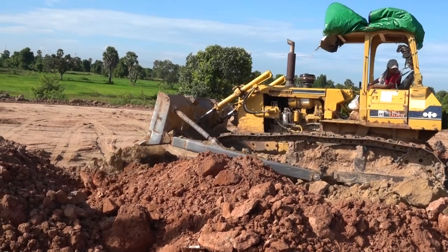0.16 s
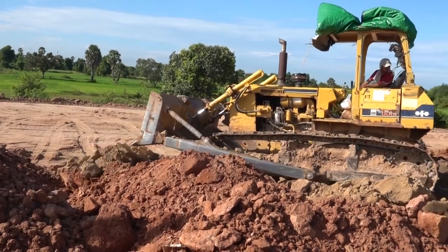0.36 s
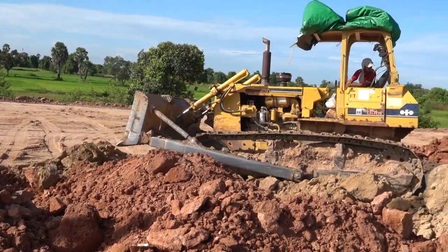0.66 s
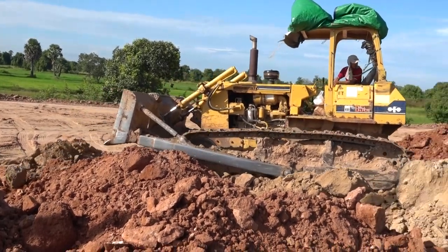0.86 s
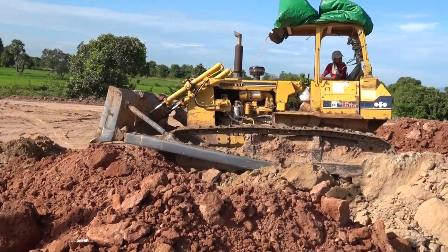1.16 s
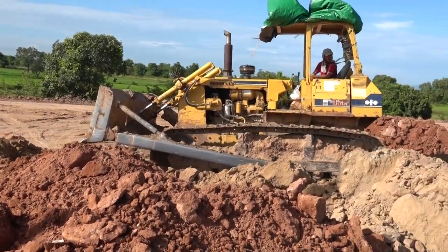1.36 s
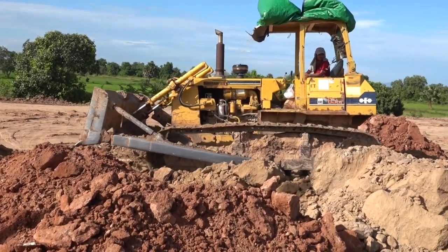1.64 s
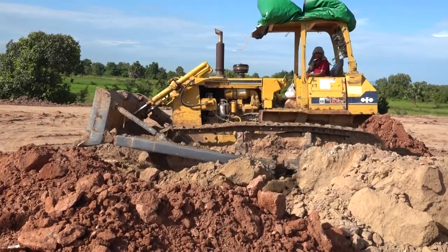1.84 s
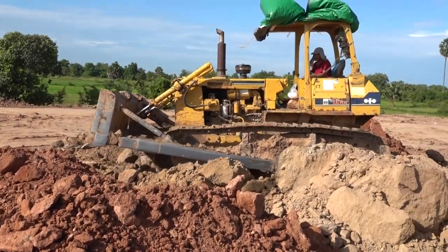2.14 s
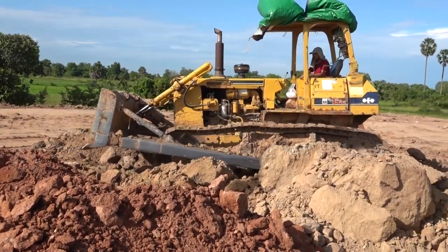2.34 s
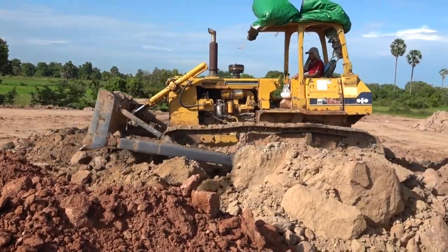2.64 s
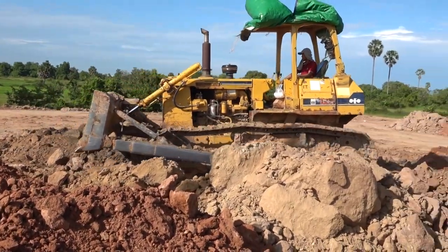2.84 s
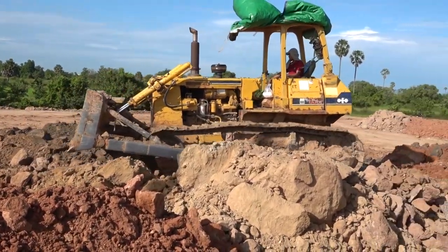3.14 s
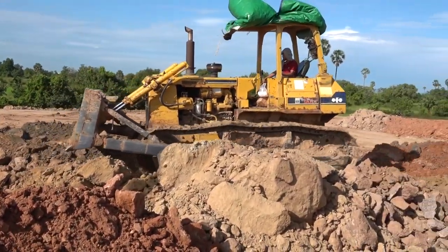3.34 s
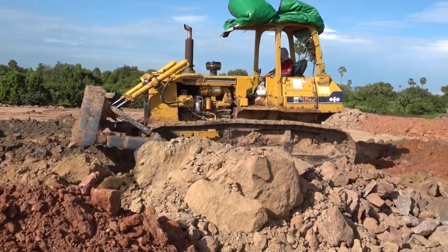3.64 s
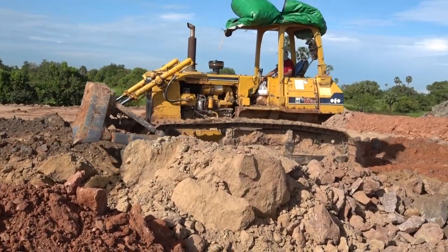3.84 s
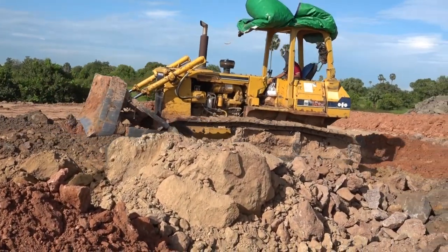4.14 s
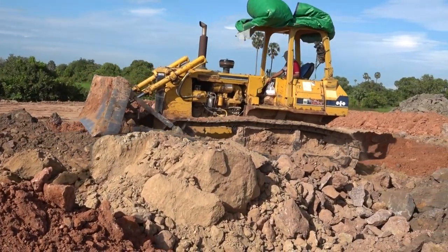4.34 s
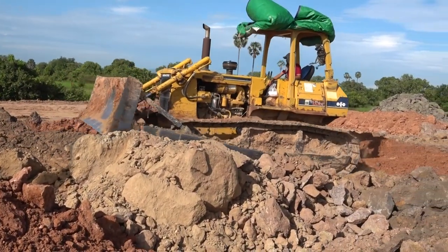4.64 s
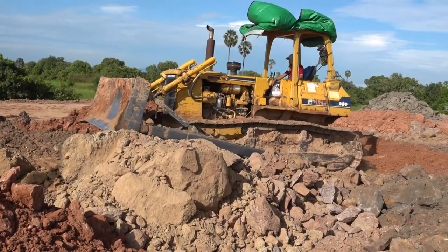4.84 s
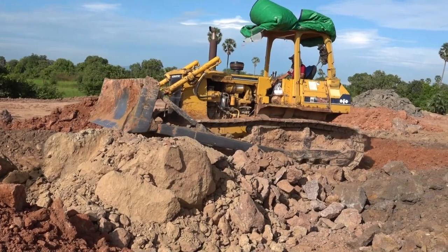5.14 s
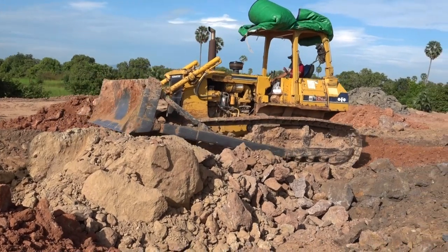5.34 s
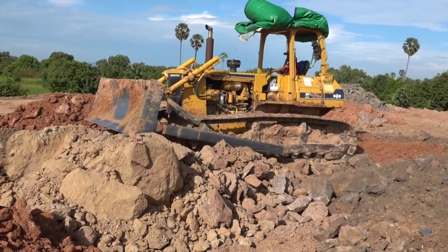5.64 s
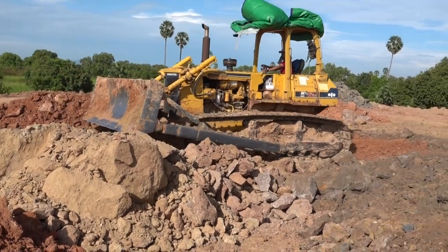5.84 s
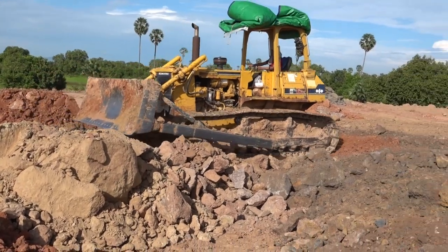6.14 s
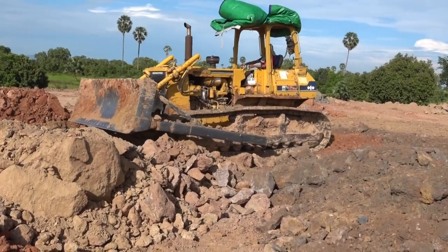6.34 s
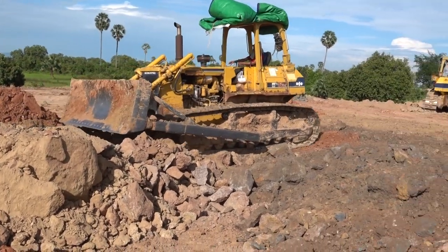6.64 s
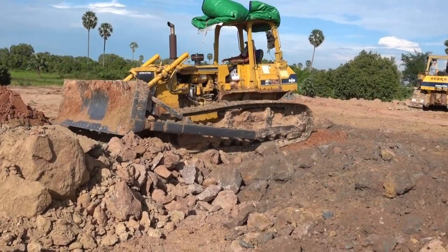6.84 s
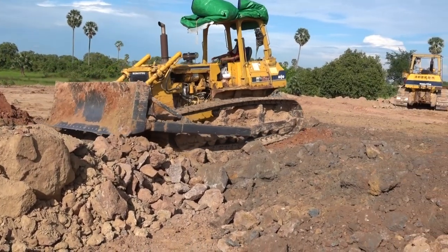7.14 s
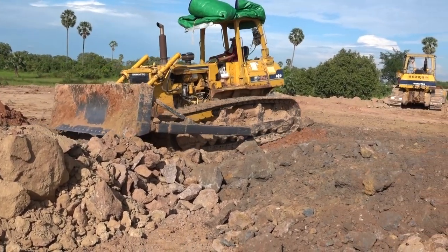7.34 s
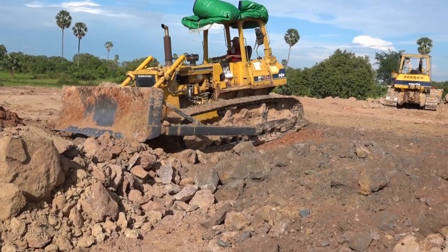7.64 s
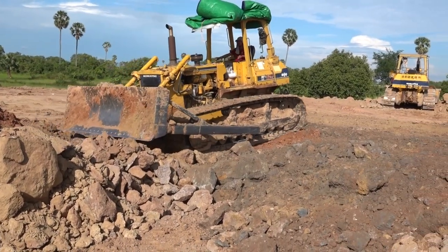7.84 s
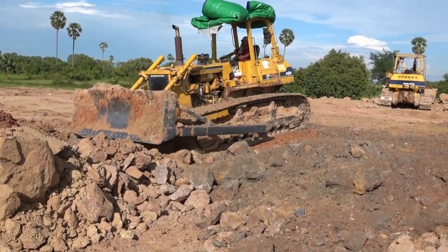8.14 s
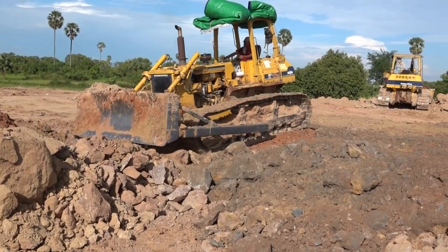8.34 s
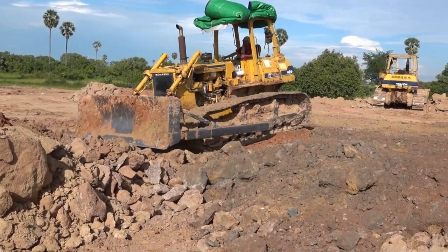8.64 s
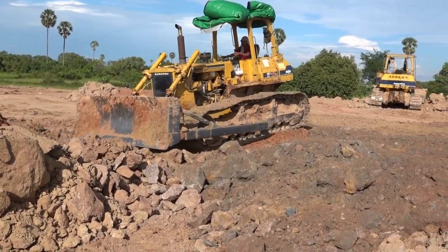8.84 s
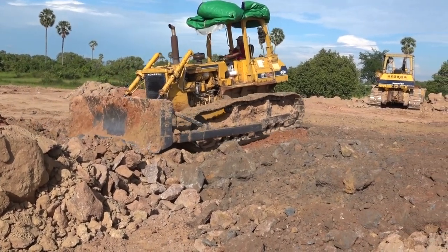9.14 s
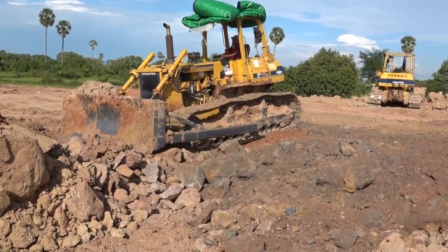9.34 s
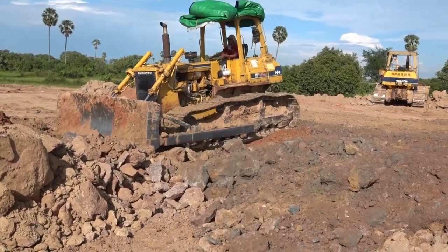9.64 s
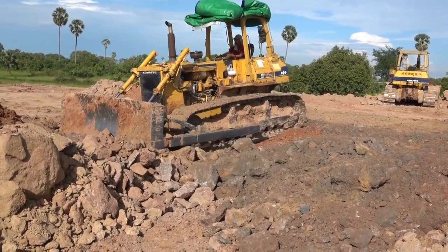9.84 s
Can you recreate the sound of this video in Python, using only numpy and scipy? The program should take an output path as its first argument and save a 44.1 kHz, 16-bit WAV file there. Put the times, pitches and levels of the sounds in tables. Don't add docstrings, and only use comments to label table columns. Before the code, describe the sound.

A bulldozer's heavy diesel drones with a deep, nearly pure exhaust hum and broad engine roar, over rumbling tracks, faint squeaks and scattered metal clanks.

```python
import sys
import numpy as np
from scipy import signal
from scipy.fft import rfft, irfft
from scipy.io import wavfile
from scipy.ndimage import uniform_filter1d, minimum_filter1d

SR = 44100
rng = np.random.default_rng(int(sys.argv[2]) if len(sys.argv) > 2 else 0)


def invert_db(x):
    u = np.asarray(x, float) / 20
    return 10 ** u


def wrap_up_sound(samples):
    columns = np.atleast_2d(samples).T
    tamed = np.clip(columns, -1, 1)
    steps = np.round(tamed * 32767).astype(np.int16)
    wavfile.write(sys.argv[1], SR, steps)


N = 440118

# time in seconds, firing rate in Hz, level in dB.
FAR_MACHINE = [
    (0, 46.67, -42),
    (1.5, 47, -39),
    (2.2, 47.2, -32),
    (3.5, 47.4, -31.5),
    (4.2, 47.6, -40),
    (9.98, 45.2, -43.5),
]
# time in seconds, level in dB.
FAN = [
    (0, -37),
    (.7, -35),
    (1.2, -51),
    (9.98, -51.5),
]
# time in seconds, level in dB.
RUMBLE = [
    (0, -36),
    (1.5, -40.5),
    (2.5, -31.5),
    (4, -38),
    (5.5, -29.5),
    (6.5, -35.5),
    (8, -37),
    (9.98, -36),
]
# time in seconds, rattle in dB, treble above it in dB, loudest ring in Hz.
CLANKS = [(1.116, -50, -12, 6100), (1.33, -55.5, -14, 8900), (1.434, -44, -13.5, 7700),
          (1.457, -44.5, -11, 8420), (1.505, -46, -7.5, 8600), (1.542, -55.5, -16, 5400),
          (1.582, -53, -4, 12180), (1.611, -48.5, -14, 6600), (2.041, -59, -14, 2510),
          (2.929, -59, -10, 6800), (3.05, -58, -5, 9584), (3.145, -51, -11, 8750), (3.163, -51.5, -6, 4770),
          (4.02, -58, -11, 8264), (5.4, -61, -3, 7855), (5.812, -56.5, 0.5, 3150), (5.843, -50.5, -7, 2650),
          (6.067, -53, -4, 2650), (6.188, -53, 3.5, 10700), (6.215, -52.5, -6, 8790), (6.455, -60, 3, 8480),
          (7.07, -53, -13, 6900), (7.091, -51, -16, 2944), (7.351, -58, -18, 3130), (7.838, -62, -2, 7540),
          (8.184, -59, -15, 3377), (8.55, -62, -4, 3950), (8.777, -50, -21, 6137), (8.816, -52, -13, 12020),
          (8.8, -55.5, -2.5, 12180)]
# start in seconds, pitch in Hz, level in dB, 60 dB decay in seconds.
PLATES = [(.123, 1150, -28, .08), (1.432, 5500, -51, .15), (1.436, 12480, -64, .25),
          (1.465, 3350, -50, .15), (1.503, 12100, -62, .15), (1.54, 5300, -56, .2), (1.6, 5700, -56, .2),
          (5.835, 8600, -59, .15), (5.84, 10030, -67, .3), (2.928, 3385, -52, .3), (7.351, 5320, -61, .35),
          (8.8, 5545, -63, .6), (5.84, 2650, -47, .12), (1.47, 1000, -31, .3)]
# start in seconds, length in seconds, level in dB.
PIN_SQUEAKS = [(.435, .025, -62), (1.152, .018, -60), (1.22, .025, -54), (1.522, .032, -55),
               (1.79, .025, -48), (2.099, .05, -51), (2.165, .05, -49), (2.222, .045, -52),
               (4.134, .04, -53), (4.17, .06, -48), (4.248, .029, -54), (6.462, .04, -57)]
# start in seconds, level in dB.
IDLER_CHIRPS = [(.005, -47.5), (.26, -66), (.33, -68), (.77, -64), (1.225, -58), (2.34, -66), (2.74, -70),
                (3.128, -60), (3.46, -59), (4.531, -62), (5.398, -64), (5.94, -70), (6.36, -64),
                (6.59, -69), (6.73, -71), (7.039, -61), (7.17, -64), (7.23, -65), (7.319, -66), (7.58, -67),
                (8.1, -67), (8.387, -64), (8.49, -72), (8.727, -63), (8.92, -67), (9.16, -71), (9.22, -66),
                (9.39, -66), (9.86, -67)]
# start in seconds, length in seconds, pitch in Hz, level in dB, glide in Hz.
HOWLS = [
    (1.72, .2, 506, -33, 0),
    (2.15, .3, 506, -30, 0),
    (2.75, .3, 445, -33, 0),
    (4.08, .2, 506, -32, 0),
    (4.1, .25, 600, -36, 15),
    (5.49, .32, 508, -26.5, 0),
    (5.7, .2, 440, -33, 0),
    (6.83, .33, 685, -35, -125),
    (8.9, .3, 1010, -40, 0),
]
PIN_HZ, IDLER_HZ, CHIRP_S = 3886, 7904, .075
GRIND_S, GRIND_LENGTH_S, GRIND_DB = 1.425, .26, -53
RING_DB, RING_DB_PER_OCTAVE = 13, -9

# time in seconds, firing rate in Hz.
SPEED = [(0, 75.2), (1.15, 84.9), (1.93, 90), (2.4, 84.4), (3.9, 84.9), (4.3, 87.6), (4.63, 92),
         (5.15, 85.6), (6.3, 84), (6.75, 88), (7.5, 83.3), (7.8, 82.3), (8.24, 82), (8.8, 95.7),
         (9.1, 96.2), (9.25, 91.2), (9.72, 101.4), (9.98, 103)]
FLYWHEEL_S = .08
VALVE_DB, FIRST_VALVE_HALF, END_VALVE_HALF = -46, 19, 31
# line in sixths of the firing rate, level in dB.
SIXTHS = [(3, -33.5), (4, -40), (5, -40.5), (8, -38.5), (9, -46.5), (10, -50.5), (18, -43), (20, -55.5),
          (24, -43), (30, -46), (39, -48.5), (42, -47.5), (21, -45), (41, -47)]
# time in seconds, hum level in dB, octave level in dB.
STACK_DB = [(0, -10, -31.5), (.7, -11, -22.5), (1.2, -11.5, -18), (1.88, -11.5, -21), (2.1, -14.5, -27),
            (2.6, -13, -25), (4.3, -13.5, -24), (4.7, -12.5, -30.5), (5.08, -16, -55), (5.65, -11.5, -34.5),
            (6.55, -9.5, -37.5), (6.85, -12, -50), (7.2, -8, -44), (7.8, -10, -29), (8.5, -9.5, -37),
            (8.95, -9, -30.5), (9.55, -11, -30), (9.98, -12, -39)]
# time in seconds, view (rear 0, side 1, front 2).
FACING = [
    (0, 0.),
    (1.6, 0.38),
    (2.8, 0.93),
    (6.2, 1.1),
    (6.9, 1.68),
    (9.4, 2.01),
    (9.98, 1.25),
]
# time in seconds, effort in dB.
EFFORT = [(0, 1.5), (.9, 1.5), (1.75, 2.5), (2.2, 0), (2.75, 2.5), (3.3, 6.5), (3.65, 5.5), (3.95, 3.5),
          (4.22, 6.5), (4.55, 3), (5.1, 1), (5.6, 4), (6.3, 0.5), (7.5, -3.5), (8.4, -2), (8.95, 1.5),
          (9.35, -2.5), (9.98, 2)]
# dB per dB of effort, dB from the rear, dB from the front.
ROAR_LAW = [
    (0.51, .5, -1.5),
    (-0.03, -2, -5.5),
    (1.41, -0.5, 0),
    (0.89, 6.5, -1),
]
ROAR_EDGES_HZ = (360, 900, 1900, 5000)
# frequency in Hz, level in dB.
ROAR_COLOUR = [(230, -5), (330, 1.06), (560, -2), (900, -4.5), (1200, -10.5), (1700, -16), (2100, -24.5),
               (2700, -28), (3400, -37.5), (4500, -39.5), (7000, -40), (9000, -48.5), (12000, -55),
               (15000, -68)]
# resonance in Hz, width in Hz, boost in dB.
PANELS_REAR = [(303, 20, 2), (390, 40, -2), (577, 120, -4.5), (825, 50, 2), (1180, 140, 4.5),
               (1500, 260, 2), (1820, 490, -5.5), (2550, 220, 4.5), (7800, 700, 2), (8600, 770, -10),
               (9800, 1000, -1), (13000, 2000, -0.5)]
PANELS_SIDE = [(241, 33, 5.5), (300, 8.3, 1.5), (434, 17, -1), (499, 7.1, 4.5), (880, 40, 1), (977, 58, 3),
               (1260, 75, -9), (1450, 140, 3.5), (2010, 140, 4.5), (4470, 540, 3), (7300, 1200, 1),
               (8600, 600, 0), (10100, 900, 2.5), (11300, 1000, -6.5)]
PANELS_FRONT = [(233, 77, -8.5), (327, 46, 7), (498, 13, 3), (1000, 46, 2), (1747, 85, -7.5),
                (1990, 230, 5), (2250, 150, -4), (2650, 130, -3), (4300, 500, 3), (5700, 200, 4.5),
                (7200, 1100, 2.5), (10000, 1000, 6), (11500, 1000, -3)]


def curves(table):
    s, *columns = np.transpose(table)
    return [np.interp(np.arange(N) / SR, s, c) for c in columns]


def unit(x):
    return x / np.sqrt(np.mean(x ** 2))


def walk(rate):
    hold = int(SR / rate)
    steps = np.repeat(rng.standard_normal(N // hold + 1), hold)
    return unit(uniform_filter1d(uniform_filter1d(steps, hold), hold)[:N])


def shape(x, db_of_hz):
    hz = np.fft.rfftfreq(N + N % 2, 1 / SR) + 1
    return irfft(rfft(x, N + N % 2) * invert_db(db_of_hz(hz)))[:N]


def band_noise(lo_hz, hi_hz):
    octave = np.log2(np.fft.rfftfreq(N + N % 2, 1 / SR) + 1)
    place = (octave - np.log2(lo_hz)) / np.log2(hi_hz / lo_hz)
    window = np.sin(np.pi * np.clip(place, 0, 1))
    return unit(irfft(window * rfft(rng.standard_normal(N + N % 2)))[:N])


def ring(x, hz, t60):
    pole = np.exp(2j * np.pi * hz / SR - np.log(1000) / (t60 * SR))
    return signal.lfilter([1], [1, -pole], x).imag


def far_machine():
    hz, db = curves(FAR_MACHINE)
    return np.sqrt(2) * invert_db(db + 1.1 * walk(3)) * np.sin(2 * np.pi * np.cumsum(hz) / SR)


def rumble():
    db, = curves(RUMBLE)
    low = invert_db(-1.5 + 1.7 * walk(3.9)) * band_noise(4.5, 70)
    middle = invert_db(2.5 + 2.1 * walk(4.2)) * band_noise(44, 200)
    return invert_db(db) * (low + middle)


def idler_whistle():
    t = np.arange(N) / SR
    return invert_db(-79 + 5 * walk(16)) * np.sin(2 * np.pi * IDLER_HZ * t + 1.2 * walk(40))


def squeals(table, waver_db, waver_rate):
    sound, t = 0, np.arange(N) / SR
    waver = invert_db(waver_db * walk(waver_rate) - waver_db)
    wobble = 0.59 * walk(waver_rate)
    for s, length, hz, db, glide_hz in table:
        part = np.clip((t - s) / length, 0, 1)
        swell = np.sin(np.pi * part) ** 0.55
        cycles = hz * t + glide_hz * length * part ** 2 / 2
        sound = sound + invert_db(db) * swell * np.sin(2 * np.pi * cycles + wobble)
    return 2 * sound * waver


def grind():
    part = np.clip((np.arange(N) / SR - GRIND_S) / GRIND_LENGTH_S, 0, 1)
    envelope = np.minimum(part / .08, 1) * (1 - part) ** .6
    scrape = band_noise(3000, 9200) + .8 * band_noise(4900, 6100) + .25 * band_noise(8000, 14500)
    return invert_db(GRIND_DB + 3 * walk(60)) * envelope * scrape


def rattle(grit, lo_hz, hi_hz, luck):
    modes = sum(invert_db(-8 * place) * ring(grit, lo_hz * (hi_hz / lo_hz) ** place, .04) for place in luck)
    band = signal.butter(4, (.8 * lo_hz, .95 * hi_hz), "band", fs=SR, output="sos")
    scrape = signal.sosfilt(band, grit)
    start = slice(0, SR // 50)
    return 0.55 * modes / modes[start].std() + .5 * scrape / scrape[start].std()


def clanks():
    sound, size = np.zeros(N + SR), SR // 4
    t = np.arange(size) / SR
    onset = np.minimum(t / .003, 1)
    for (s, low_db, treble_db, hz), luck in zip(CLANKS, rng.random((len(CLANKS), 2, 7))):
        grit = rng.standard_normal(size) * np.exp(-t / .018) * onset
        blow = invert_db(low_db) * rattle(grit, 4700, 8000, luck[0])
        blow += invert_db(low_db + treble_db) * rattle(grit, 8000, 12500, luck[1])
        ring_db = low_db + RING_DB + RING_DB_PER_OCTAVE * np.log2(hz / 2700)
        blow += invert_db(ring_db) * np.sin(2 * np.pi * hz * t) * np.exp(-t / 0.016) * onset
        sound[int(s * SR):][:size] += blow
    for s, hz, db, t60 in PLATES:
        plate = invert_db(db + 7.5 - 60 * t / t60) * np.sin(2 * np.pi * hz * t)
        sound[int(s * SR):][:size] += plate * np.minimum(t / .002, 1)
    ticks = (rng.random(N) < 25 / SR) * invert_db(2.1 * rng.exponential(size=N))
    patter = signal.lfilter([1], [1, -np.exp(-1 / (.008 * SR))], ticks)
    return sound[:N] + invert_db(-73.5) * patter * band_noise(5000, 15500)


def cooling_fan(turns):
    db, = curves(FAN)
    return np.sqrt(2) * invert_db(db + 1.5 * walk(4)) * np.sin(2 * np.pi * turns * 7 / 3)


def valve_gear(turns):
    sound = 0
    for half in range(FIRST_VALVE_HALF, END_VALVE_HALF, 2):
        level = invert_db(VALVE_DB - .3 * (half - FIRST_VALVE_HALF) + 3 * walk(1.2))
        sound = sound + level * np.sin(np.pi * half * turns + 7 * rng.random() + .5 * walk(3))
    return sound * invert_db(.5 * curves(EFFORT)[0])


def colour_db(hz):
    table_hz, db = np.transpose(ROAR_COLOUR)
    return np.interp(np.log(hz), np.log(table_hz), db)


def knock(turns):
    at = np.flatnonzero(np.diff(np.floor(turns)))
    size = invert_db(2.5 * rng.standard_normal(len(at)))
    sound = 0
    for cylinder in range(6):
        blows = np.zeros(N)
        blows[at[cylinder::6]] = size[cylinder::6]
        block = rng.standard_normal(SR // 10) * np.exp(-np.arange(SR // 10) / (0.024 * SR))
        sound = sound + signal.fftconvolve(blows, block)[:N]
    return unit(shape(sound, lambda hz: colour_db(hz) - 40 * (hz < 210) - 5 * np.log2(1 + hz / 1200)))


def views():
    facing = np.clip(curves(FACING)[0], 0, 2)
    return np.clip(1 - abs(facing - np.arange(3)[:, None]), 0, 1)


def body(x, panels):
    ripple = uniform_filter1d(uniform_filter1d(rng.standard_normal(SR // 2 + 2), 25), 25)
    ripple_db = 1.2 * unit(ripple)

    def gain_db(hz):
        peaks_db = sum(db / (1 + (2 * (hz - f) / width) ** 2) for f, width, db in panels)
        return ripple_db[hz.astype(int)] + peaks_db

    return shape(x, gain_db)


def roar(turns):
    rear, side, front = views()
    changes_db = np.array(ROAR_LAW) @ np.array([curves(EFFORT)[0], rear, front])
    sound, surge = 0, walk(3)
    for hz in 200 * 2 ** np.arange(0, 6.4, 1 / 3):
        place = np.interp(np.log(hz), np.log(ROAR_EDGES_HZ), np.arange(4))
        share = np.clip(1 - abs(place - np.arange(4)), 0, 1)
        db = colour_db(hz) + 10 * np.log10(hz)
        firing_beat = .06 * np.cos(2 * np.pi * (turns + rng.random()))
        crank_beat = .06 * np.cos(2 * np.pi * (turns / 3 + rng.random()))
        flicker_db = .4 * surge + .8 * walk(1.5) + .6 * walk(12)
        level = invert_db(db + share @ changes_db + flicker_db) * (1 + firing_beat + crank_beat)
        sound = sound + level * band_noise(hz / 1.26, hz * 1.26)
    sound = unit(sound) + invert_db(-4 + changes_db[0]) * knock(turns)
    seen = rear * body(sound, PANELS_REAR) + side * body(sound, PANELS_SIDE) + front * body(sound, PANELS_FRONT)
    return invert_db(-26.0) * seen


def exhaust(turns):
    hum_db, octave_db = curves(STACK_DB)
    hum_db = hum_db + .6 * walk(6.7) + .22 * walk(12)
    octave_db = octave_db + 1.3 * walk(4.5) + 1.2 * walk(12)
    sound = invert_db(hum_db) * np.sin(2 * np.pi * turns)
    sound += invert_db(octave_db) * np.cos(4 * np.pi * turns + .3 * walk(3))
    for sixths, db in np.array(SIXTHS):
        drift = .3 * walk(1.5)
        sound += invert_db(db + 2.5 * walk(2.5)) * np.sin(2 * np.pi * (np.round(sixths) * turns / 6 + drift))
    return np.sqrt(2) * sound


def crank():
    hz = uniform_filter1d(curves(SPEED)[0], size=int(FLYWHEEL_S * SR), mode="nearest")
    return np.cumsum(hz * (1 + .0015 * walk(12))) / SR


def scene():
    turns = crank()
    squeaks = [(s, length, PIN_HZ, db, 0) for s, length, db in PIN_SQUEAKS]
    squeaks += [(s, CHIRP_S, IDLER_HZ, db, 0) for s, db in IDLER_CHIRPS]
    tones = idler_whistle() + squeals(squeaks, 2.5, 60) + squeals(HOWLS, 2.2, 20)
    tracks = rumble() + tones + grind() + clanks()
    engine = cooling_fan(turns) + valve_gear(turns) + roar(turns) + exhaust(turns)
    return (far_machine() + tracks + engine)[None]


def roll_off(x):
    return signal.sosfilt(signal.butter(12, 15720, fs=SR, output="sos"), x)


def record(dry):
    duck = np.minimum(1, .635 / (abs(dry) + 1e-9))
    duck = minimum_filter1d(duck, size=401)
    duck = uniform_filter1d(uniform_filter1d(duck, size=201), size=201)
    return roll_off(dry * duck)


dry = scene()
out = record(dry)
wrap_up_sound(out)
```